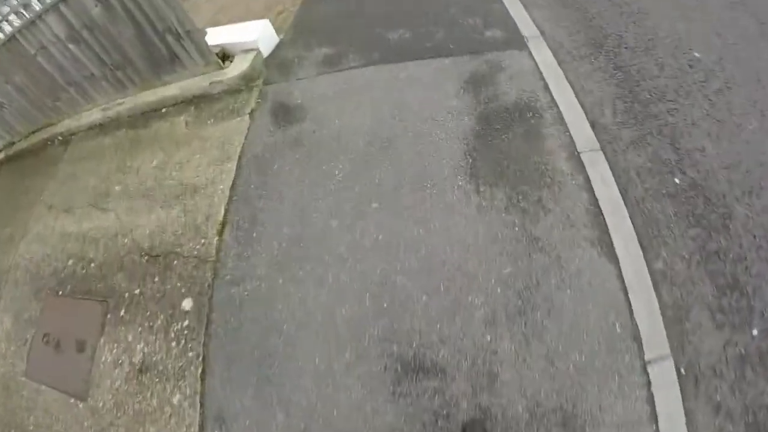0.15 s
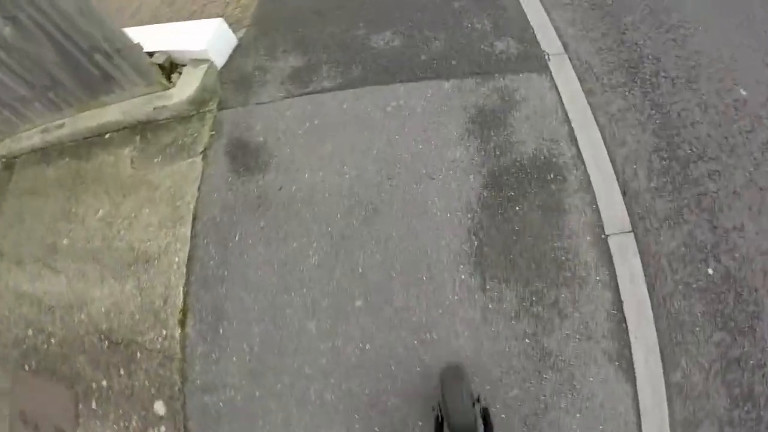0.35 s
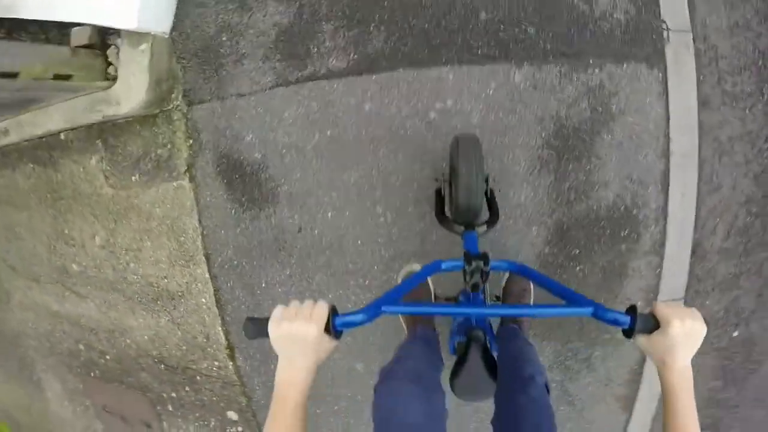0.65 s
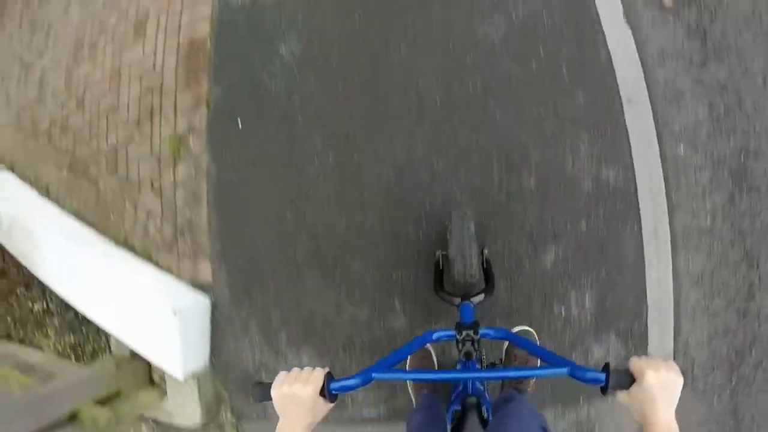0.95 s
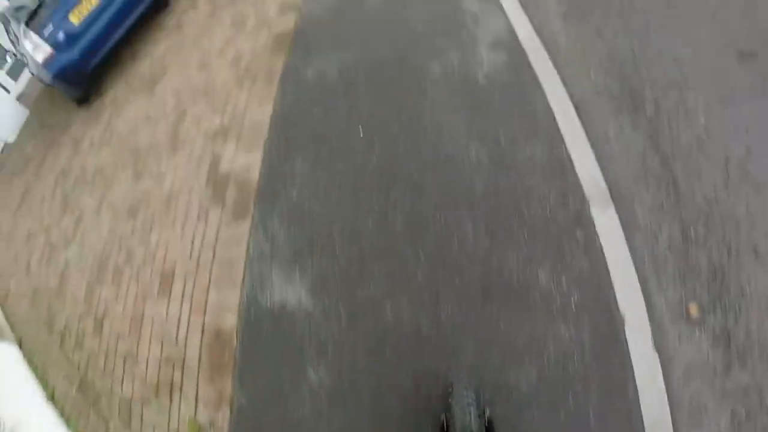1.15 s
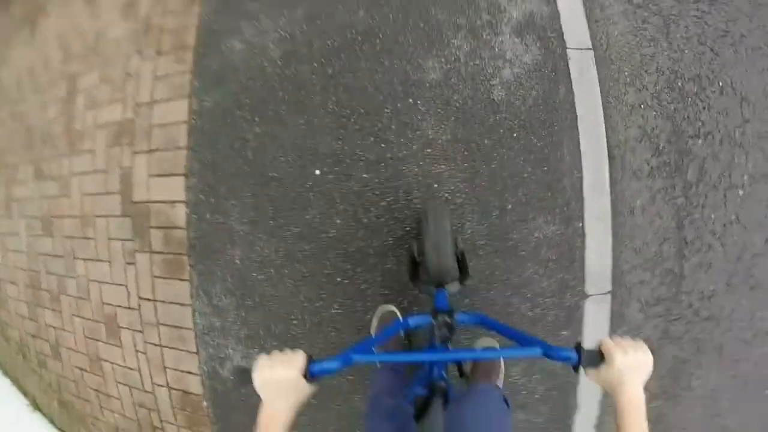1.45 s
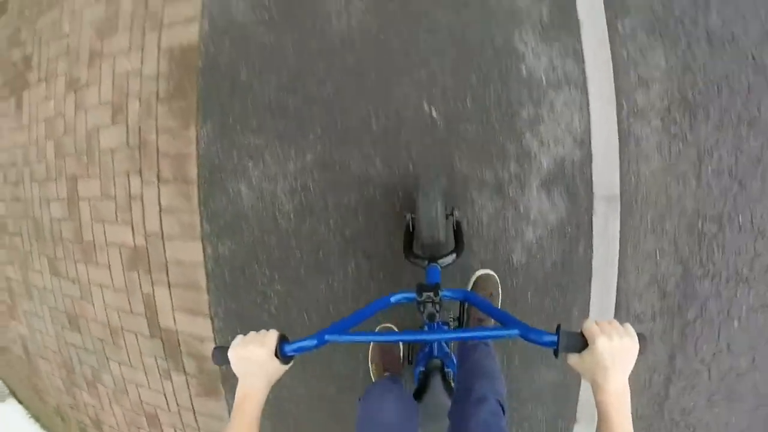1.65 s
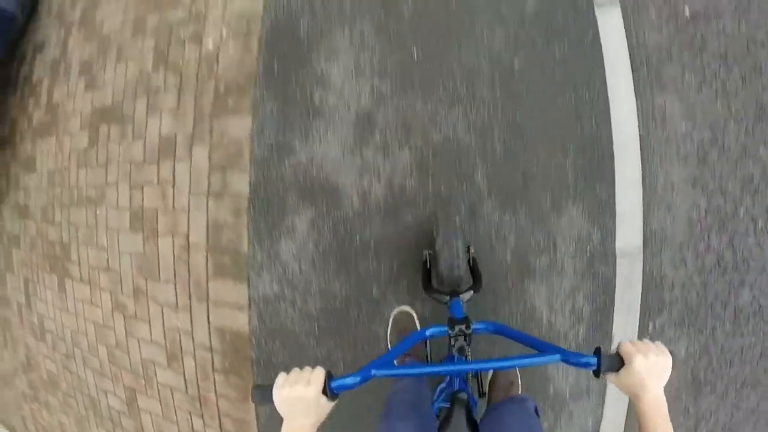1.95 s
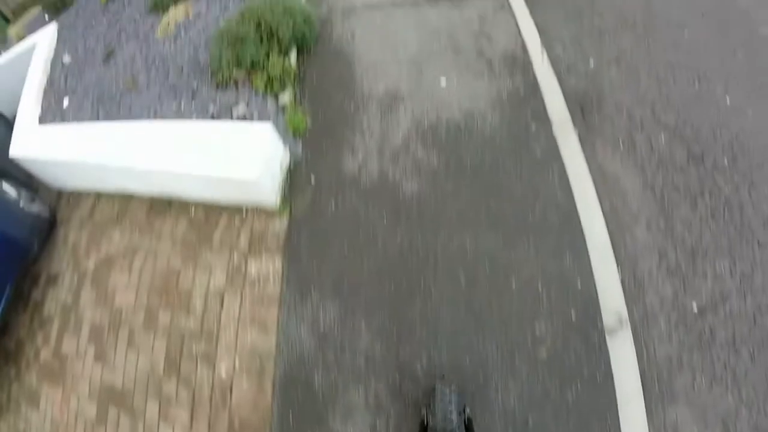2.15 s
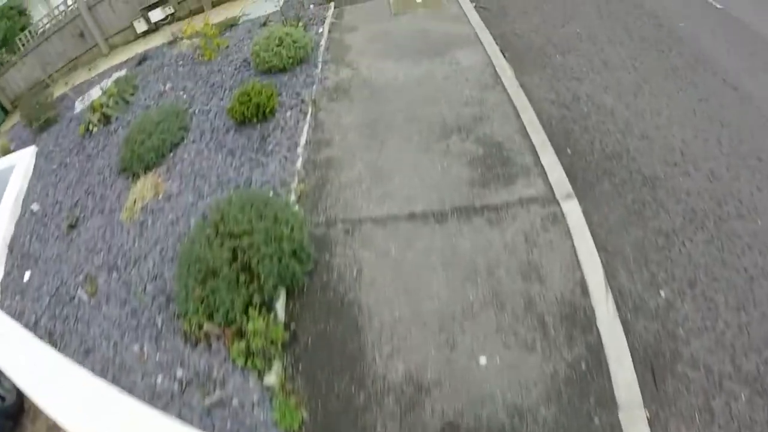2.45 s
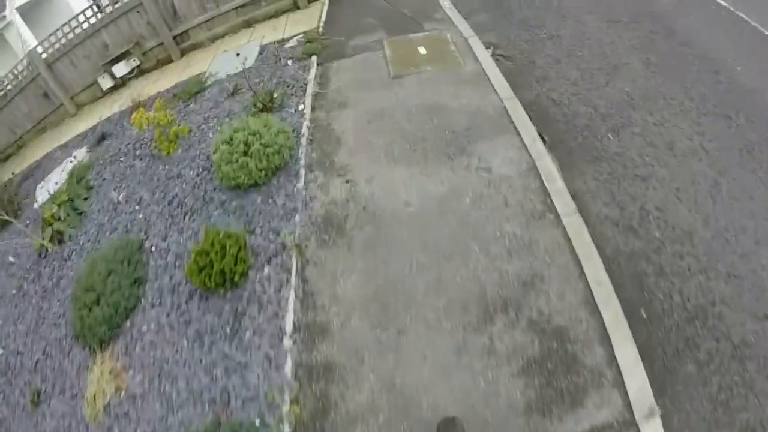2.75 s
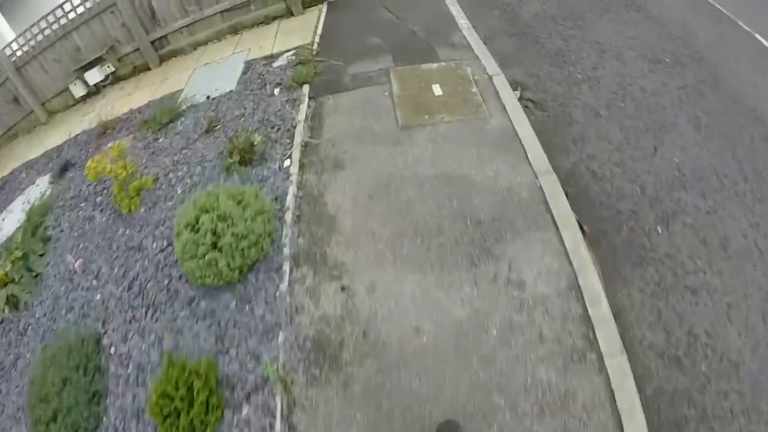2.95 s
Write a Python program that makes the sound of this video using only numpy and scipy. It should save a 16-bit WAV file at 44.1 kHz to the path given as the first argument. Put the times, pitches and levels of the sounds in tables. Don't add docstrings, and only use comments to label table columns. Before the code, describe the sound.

A small bike rolls over asphalt with low wind thumps, short rough squeaks and metallic ticks

```python
import sys
import numpy as np
from scipy import signal
from scipy.io import wavfile
from scipy.ndimage import uniform_filter1d

SR = 44100
rng = np.random.default_rng(int(sys.argv[2]) if len(sys.argv) > 2 else 0)


def linear_from_db(decibels):
    return 10 ** (np.asarray(decibels, float) / 20)


def int16_out(signal):
    q = np.round(np.clip(np.atleast_2d(signal).T, -1, 1) * 32767)
    wavfile.write(sys.argv[1], SR, q.astype(np.int16))


N = 138915
T = np.arange(N) / SR


def evened(x):
    return x / np.sqrt(np.mean(x ** 2) + 1e-20)


def along(rows, count):
    rows = np.array(rows)
    return np.interp(T, rows[:, 0], rows[:, count])


def smoothed_power(x, size):
    return uniform_filter1d(uniform_filter1d(x ** 2, size=size), size=size)


def noise(shape, size, patchy_db, flicker_db):
    frames, bin_hz = 4 * N // size + 5, np.fft.rfftfreq(size, 1 / SR)
    real, imag, c = rng.standard_normal((frames, len(bin_hz), 3)).T
    patches = evened(uniform_filter1d(uniform_filter1d(c, size=12, axis=0), size=8, axis=1))
    shape_hz, shape_db = np.transpose(shape)
    colour_db = np.interp(np.log(bin_hz + 1), np.log(shape_hz + 1), shape_db, -100, -140)[:, None]
    level_db = colour_db + patchy_db * patches + flicker_db * rng.standard_normal(frames)
    spectra = (real + 1j * imag) * linear_from_db(level_db)
    return evened(signal.istft(spectra, nperseg=size, noverlap=3 * size // 4)[1][:N])


def resonate(x, hz, width_hz):
    turn = np.exp(2j * np.pi * np.cumsum(hz * np.ones(len(x))) / SR)
    r = np.exp(-np.pi * width_hz / SR)
    shifted = x / turn + 1e-18
    return 2 * (turn * signal.lfilter([(1 - r) ** 2], [1, -2 * r, r * r], shifted)).real


def clicks(per_s, spread_db):
    chance, size, sign = rng.random(N), rng.exponential(1, N), rng.choice([-1., 1.], N)
    return sign * linear_from_db(spread_db * np.minimum(size, 4)) * (chance < per_s / SR)


def creak(gain, centre_hz, body):
    def ring(x):
        out = 0
        for n, (ratio, width_hz, db) in enumerate(body):
            out = out + (-1) ** n * linear_from_db(db) * resonate(x, centre_hz * ratio, width_hz)
        return out

    slips = clicks(per_s=2600, spread_db=2.5)
    force = np.sqrt(smoothed_power(ring(slips), size=600))
    return ring(gain * slips / force)


# (time [s], level [dB])
GUSTS = [(0, -46.5), (.25, -35), (.45, -44.5), (.6, -37), (.72, -41.5), (.9, -33.5), (1.05, -35),
         (1.15, -43), (1.27, -33.5), (1.5, -38), (1.63, -38.5), (1.8, -40.5), (1.92, -35.5), (2.0, -43),
         (2.25, -36), (2.5, -40), (2.75, -35.5), (3.1, -49)]
# (frequency [Hz], density [dB per Hz])
WIND_COLOUR = [(7.1, 2), (12, 12.5), (22, 0.5), (31, -7), (56, -7), (86, -45.5), (110, -65.5), (140, -92),
               (240, -120)]


def wind():
    air = noise(WIND_COLOUR, size=8192, patchy_db=.1, flicker_db=.1)
    air = air / np.sqrt(smoothed_power(air, size=5000) + .05)
    return linear_from_db(along(GUSTS, count=1) + 4.0) * air


# (frequency [Hz], density [dB per Hz])
ROAD_COLOUR = [(75, 0), (350, -10), (1050, -16.5), (1700, -15), (2700, -20), (3400, -23), (4700, -26.5),
               (15000, -44.5)]
# (time [s], level [dB])
ROLL = [(0.0, -56.5), (0.76, -55), (1.05, -57.5), (1.51, -52.5), (2.26, -55.5), (3.15, -48.5)]


def tyres():
    roll_db = along(ROLL, count=1)
    level_db = -54 + 0.3 * (roll_db - roll_db.mean())
    return linear_from_db(level_db) * noise(ROAD_COLOUR, size=1024, patchy_db=0.77, flicker_db=1.08)


# (middle [s], length [s], level [dB], centre [Hz])
SQUEAKS = [(0.017, 0.12, -55, 1760), (.193, .04, -51.5, 1750), (0.522, 0.058, -51.5, 1740),
           (0.694, 0.074, -60, 1770), (0.766, 0.096, -44, 1820), (0.829, 0.048, -58, 1710),
           (1.314, 0.087, -43.5, 1735), (1.424, 0.087, -48, 1740), (1.513, 0.12, -50.5, 1750),
           (1.7, 0.21, -54.5, 1760), (1.787, 0.068, -42.5, 1700), (1.822, 0.087, -46.5, 1850),
           (1.93, 0.17, -56.5, 1680), (2.459, 0.061, -54, 1610)]
# (ratio to centre [1], width [Hz], level [dB])
HOUSING = [(.77, 360, -4), (.98, 320, 0), (1.22, 420, -4), (1.5, 550, -12)]


def squeaks():
    lean, gain = 1.35, 0
    for middle_s, length_s, db, _ in SQUEAKS:
        progress = np.clip((T - middle_s) / length_s + 0.56, 0, 1)
        gain = gain + linear_from_db(db) * np.sin(np.pi * progress ** lean) ** 2
    return creak(gain, along(SQUEAKS, count=3), HOUSING)


# (frequency [Hz], level [dB], t60 [s])
MODES = [(2695, 7, 0.009), (3970, 1, .012), (4400, -4.5, 0.023), (4850, -4, 0.023), (5700, -7, 0.017),
         (6500, -10.5, 0.011), (7330, -9.5, 0.0054), (8600, -15, 0.0094), (9750, -23.5, 0.0049),
         (11100, -17.5, 0.0077)]
# (time [s], level [dB])
RATTLE = [(0, -65), (.7, -64.5), (.9, -58), (1.3, -60), (1.6, -73), (1.765, -61.5), (1.785, -52),
          (1.83, -60.5), (2.3, -62.5), (3.15, -79)]


def rattle():
    t, variants, per_s = np.arange(800) / SR, 12, 900
    hz, db, t60_s = np.transpose(MODES)[:, :, None]
    phase, off, size = rng.random((3, variants, len(MODES), 1))
    detune = .07 * np.log2(hz / 2300) * (2 * off - 1)
    decay = linear_from_db(db + 8 * size - 80 * t / t60_s)
    rings = (decay * np.sin(2 * np.pi * (hz * (1 + detune) * t + phase))).sum(1)
    fine = sum(signal.oaconvolve(clicks(per_s / variants, spread_db=3.5), ring)[:N] for ring in rings)
    return linear_from_db(along(RATTLE, count=1) - 3) * evened(fine)


# (middle [s], length [s], level [dB], frequency [Hz])
WHISTLES = [
    (0.197, 0.99, -76, 5780),
    (2.974, 0.14, -79, 5770),
]


def bearing():
    out = 0
    for middle_s, length_s, db, hz in WHISTLES:
        swell = np.cos(np.pi * np.clip((T - middle_s) / length_s, -.5, .5))
        out = out + linear_from_db(db) * swell * evened(resonate(rng.standard_normal(N), hz, width_hz=280.0))
    return out


# (frequency [Hz], level [dB])
WHINE = [(10000, -106), (12000, -102)]


def whine():
    return sum(linear_from_db(db) * np.sin(2 * np.pi * hz * T) for hz, db in WHINE)


# (time [s], peak [dB], loudest region [Hz])
TICKS = [(.07, -58, 2900), (0.144, -48.5, 2590), (.464, -47, 3000), (.75, -50, 4500), (0.84, -49.5, 5500),
         (0.926, -47, 2700), (.979, -39.5, 3560), (1.061, -55, 4300), (1.098, -51, 3300),
         (1.149, -54, 7000), (1.228, -42.5, 3920), (1.292, -48, 4600), (1.778, -48, 5500),
         (1.787, -50, 6000), (1.796, -49, 6000), (1.842, -47, 5100), (1.916, -49.5, 5600),
         (1.923, -45, 5700), (2.024, -54, 3500), (2.063, -52, 4000), (2.209, -48.5, 4900),
         (2.269, -49, 4850), (2.294, -51, 8000), (2.802, -50, 4400), (2.839, -53, 8600)]


def ticks():
    t, out = np.arange(2000) / SR, np.zeros(N + 2000)
    hz, _, t60_s = np.transpose(MODES)[:, :, None]
    fall_db_per_oct2, attack_s = 8.0, 0.0012
    mix = rng.standard_normal((len(TICKS), 2, len(MODES), 1))
    for (start_s, peak_db, top_hz), (vary, detune) in zip(TICKS, mix):
        region_db = 10.0 * (hz < 3000) - fall_db_per_oct2 * np.log2(hz / top_hz) ** 2
        decay = linear_from_db(0.75 * vary + region_db - 60 * t / t60_s)
        modes = decay * np.sin(2 * np.pi * hz * (1 + 0.016 * detune) * t + 3 * vary)
        tick = modes.sum(0) * np.minimum(t / attack_s, 1)
        out[round(start_s * SR):][:2000] += linear_from_db(peak_db) * tick / abs(tick).max()
    return out[:N]


# (time [s], push [dB], sign [1], length [s])
JOLTS = [(0.524, -24, 1, 0.071), (0.553, -26.5, -1, 0.035), (0.804, -20.5, 1, 0.034),
         (0.846, -17.5, -1, 0.055), (0.896, -20.5, -1, 0.035), (0.943, -27.5, -1, 0.019),
         (0.996, -21.5, -1, 0.032), (1.747, -20, -1, 0.018), (1.763, -20.5, 1, 0.031),
         (1.802, -19.5, 1, 0.066), (1.837, -23.5, -1, 0.021), (3.16, -27, 1, 0.071)]


def jolts():
    out = np.zeros(N)
    for middle_s, db, sign, length_s in JOLTS:
        u = (T - middle_s) / (length_s / 3)
        out += np.sign(sign) * linear_from_db(db) * (1 - 0.7 * u ** 2) * np.exp(-u ** 2 / 2)
    return out


# (time [s], level [dB], centre [Hz])
RUB = [(2.5, -70, 1760), (2.6, -58.5, 1870), (2.74, -55.5, 2300), (2.85, -62, 2140), (2.875, -53, 2260),
       (3.0, -52, 2480), (3.04, -47.5, 2190), (3.075, -53.5, 1860), (3.15, -54, 2230)]
# (ratio to centre [1], width [Hz], level [dB])
RUBBED = [(.72, 600, -4), (.92, 550, -1), (1.15, 420, 0)]


def rub():
    fade_in = np.clip((T - RUB[0][0]) * 20, 0, 1)
    return creak(linear_from_db(along(RUB, count=1)) * fade_in, along(RUB, count=2), RUBBED)


def scene():
    mix = wind() + tyres() + squeaks() + rattle() + bearing() + ticks() + jolts() + rub()
    return mix[None]


# (start [s], end [s])
GAPS = [(.18, .27), (.37, .41), (.5, .65), (.78, .86), (.91, 1.03), (1.06, 1.09), (1.18, 1.25),
        (1.44, 1.48), (1.61, 1.65), (1.74, 1.78), (2.14, 2.33)]


def top_band_dropouts(x):
    low = signal.oaconvolve(x, signal.firwin(511, 12900, fs=SR)[None], "same")
    shut = uniform_filter1d(sum(1. * (T > start_s) * (T < end_s) for start_s, end_s in GAPS), size=600)
    return x - shut * (x - low)


def band_limit(x):
    return signal.sosfilt(signal.butter(12, 15070, fs=SR, output="sos"), x)


def record(dry):
    mix = top_band_dropouts(dry + whine())
    return band_limit(mix)


dry = scene()
out = record(dry)
int16_out(out)
```